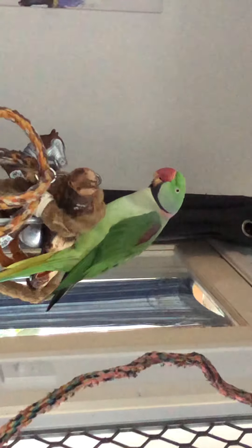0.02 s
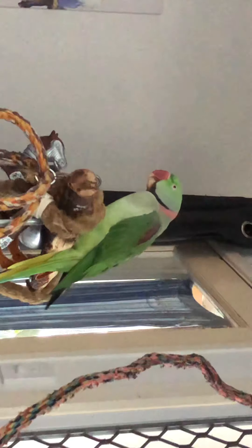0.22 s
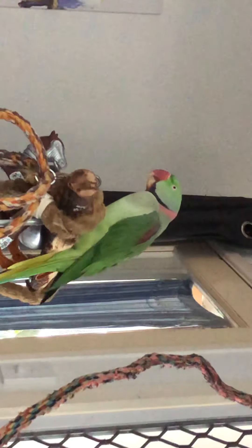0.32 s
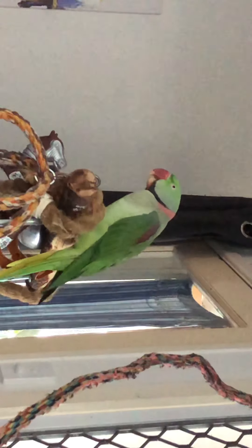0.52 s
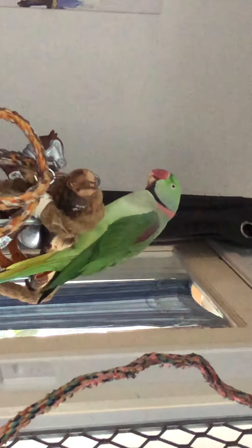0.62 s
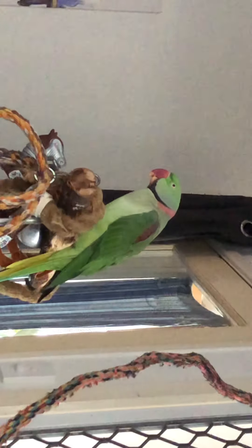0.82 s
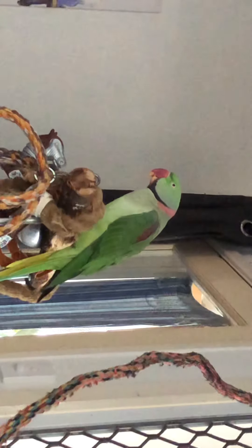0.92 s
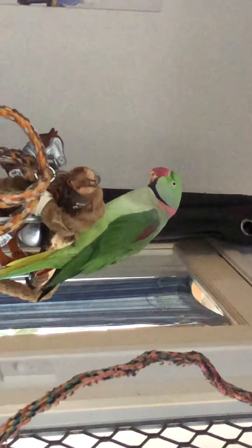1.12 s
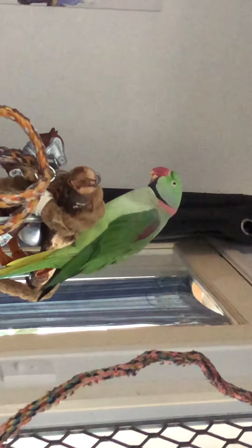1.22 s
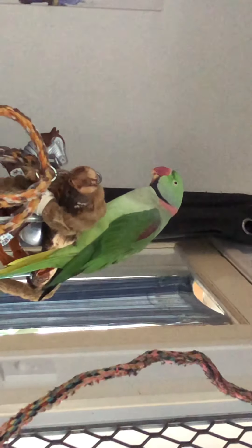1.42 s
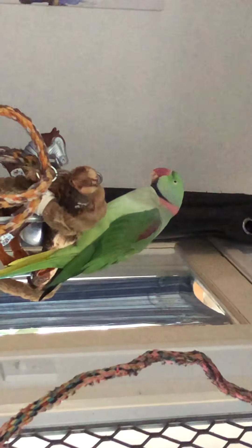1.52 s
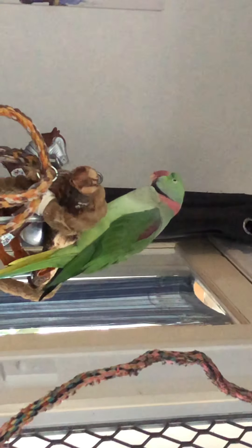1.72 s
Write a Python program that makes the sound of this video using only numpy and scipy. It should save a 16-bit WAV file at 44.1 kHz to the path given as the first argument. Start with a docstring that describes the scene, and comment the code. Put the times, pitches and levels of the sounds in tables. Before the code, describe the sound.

A single loud parakeet squawk breaks a quiet indoor rumble: a quick upward whoop, a raspy drop, then a held buzzing note that stops sharply and rings briefly in a small, hard-walled room, heard in mono.

```python
"""A low, steady background rumble; 0.22 s in, a parakeet gives one loud squawk in a small, hard-walled room.
The voice whoops up, drops through a rasping dip and settles on a held, buzzing note; the room rings on.
Rumble: coloured noise. Voice: syrinx harmonics filtered by throat and beak, plus noise pulsed by each cycle.
Room: discrete near reflections and a diffuse noise tail with its own decay per band."""
import sys
import numpy as np
from scipy import signal
from scipy.fft import rfft, irfft
from scipy.io import wavfile

SR = 44100
rng = np.random.default_rng(int(sys.argv[2]) if len(sys.argv) > 2 else 0)


def file_out(sig):
    """Save sig as 16-bit WAV at sys.argv[1]."""
    # one column per channel
    cols = np.atleast_2d(sig).T
    # limit, then scale
    lim = np.clip(cols, -1, 1)
    pcm = np.round(lim * 32767).astype(np.int16)
    wavfile.write(sys.argv[1], SR, pcm)


N = 79380
TIME_S = np.arange(N) / SR

# background rumble spectrum: freq_hz [Hz], relative_level_db [dB per Hz]
RUMBLE_SPECTRUM = [(28, -31), (35, -16.5), (42, 4), (55, -5.5), (85, -6.5), (125, -1.5), (200, -6.5),
                   (350, -8), (600, -15), (1200, -19.5), (2200, -30), (5000, -37.5), (15000, -42)]
# pitch of the squawk: time_s [s], pitch_hz [Hz]
PITCH_CURVE = [(.222, 967.6), (.228, 1105), (.234, 1418), (.25, 1652), (.257, 1756), (.266, 2120),
               (.275, 2289), (.288, 2333), (.302, 2273), (.311, 2129), (.322, 1700), (.335, 1485),
               (.352, 1413), (.372, 1442), (.39, 1564), (.42, 1599), (.45, 1630), (.495, 1628),
               (.522, 1644)]
# effort of the squawk: time_s [s], level_db [dB], roughness [0-1], odd_harmonics_db [dB],
# overtones_above_second_db [dB], buzz [0-1]
EFFORT_CURVE = [(.223, -29.5, .55, 3, 3, .1), (.24, -21, .42, 2, 4.5, .1), (.26, -14.5, .45, -2, 8, .2),
                (.29, -10, .38, 4, -6, 0.4), (.318, -12.5, .6, -2, 8, .2),
                (.355, -19.5, .55, -6.5, 1.5, .2), (.385, -12, 0.2, -4.5, 1, .4),
                (.415, -10, .3, -4, -3.5, 0.3), (.46, -16, .25, -2, 3, 0.92),
                (.515, -15.5, .22, -1, -1.5, 0.9)]
# syrinx harmonics, from the first up: level_db [dB]
SYRINX_HARMONICS_DB = [-4, 0, -8.5, -6.5, -10, -14.5, -11.5, -15.5, -16.5]
# throat and open-beak response: freq_hz [Hz], gain_db [dB]
THROAT_RESPONSE = [(900, -7), (1400, -10.5), (1650, -8), (2300, -6), (2650, -8), (3250, -1), (3650, 0.5),
                   (4100, -2.5), (4650, -4), (4900, -2), (5300, -6.5), (6000, -1), (7200, -11),
                   (8200, -8.5), (9200, -14), (9900, -19.5), (11500, -15), (15500, -17.5)]
# rasp spectrum: freq_hz [Hz], relative_level_db [dB per Hz]
RASP_SPECTRUM = [(600, -56), (1100, -28.5), (1700, -9), (2200, -2), (2600, -16), (3300, -3.5), (4400, -3),
                 (5100, -13.5), (6100, 2.5), (8000, -6.5), (9200, -12.5), (9900, -20), (11200, -13),
                 (15500, -13.5)]
# near surfaces: delay_s [s], gain_db [dB]
NEAR_REFLECTIONS = [(.0031, -7), (.0074, -23), (0.0143, -20.5)]
# room decay by band: centre_hz [Hz], t60_s [s]
ROOM_DECAY = [(1000, 0.19), (1650, 0.46), (2300, 0.4), (3300, 0.44), (4100, 0.18), (4900, 0.4),
              (8000, 0.33), (11500, 0.25), (15000, 0.27)]

RUMBLE_RMS_DB = -58.5
START_S, ATTACK_S, END_S, RELEASE_S = 0.2199, 0.0074, 0.54, 0.0082
# fractional pitch spread: jitter at full roughness, waver always present
JITTER_FRACTION, JITTER_CORNER_HZ = 0.013, 800
WAVER_FRACTION, WAVER_CORNER_HZ = 0.001, 70
SHIMMER_DB, SHIMMER_CORNER_HZ = 1.5, 240  # level spread at full roughness
# slower syrinx vibration, at full buzz; treble boost applies from the fifth harmonic up
BUZZ_HZ, BUZZ_SWING_RAD, BUZZ_DEPTH, BUZZ_TREBLE_DB = 389, 0.18, 0.06, 6.5
RASP_DB, RASP_PULSE_DEPTH = -9, 0.96  # rasp level at full roughness
ROOM_DB, ROOM_DELAY_S, ROOM_BUILD_S = -1.5, 0.0028, 0.0042
CUTOFF_HZ = 15800


def from_db(db):
    """Decibels to amplitude gain."""
    return 10 ** (np.asarray(db) / 20)


def rms_one(x):
    """Scale to unit rms."""
    return x / np.sqrt(np.mean(x ** 2) + 1e-20)


def in_time(rows):
    """Interpolate each column of a curve at every sample."""
    time_s, *columns = np.transpose(rows)
    return [np.interp(TIME_S, time_s, column) for column in columns]


def at_hz(points, hz):
    """Read a spectrum on a log-frequency axis."""
    freq_hz, value_db = np.transpose(points)
    return np.interp(np.log(np.maximum(hz, 1)), np.log(freq_hz), value_db)


def colour(x, spectrum):
    """Filter by a smooth spectrum."""
    gain = from_db(at_hz(spectrum, np.fft.rfftfreq(N, 1 / SR)))
    return irfft(rfft(x) * gain, N)


def noise(spectrum, flow=1):
    """Noise of unit rms: white noise scaled by the flow, then coloured."""
    return rms_one(colour(flow * rng.standard_normal(N), spectrum))


def drift(corner_hz):
    """Random motion of unit rms: white noise through a double-pole low-pass."""
    pole = np.exp(-2 * np.pi * corner_hz / SR)
    white = rng.standard_normal(2 * N)
    smooth = signal.lfilter([1], [1, -2 * pole, pole * pole], white)
    return rms_one(smooth[N:])  # first half lets the filter settle


def background_rumble():
    """Steady noise, strongest in the bass."""
    return from_db(RUMBLE_RMS_DB) * noise(RUMBLE_SPECTRUM)


def syrinx(phase, odd_db, overtone_db, buzz_amount):
    """Sum of phase-locked harmonics whose balance follows effort and buzz."""
    source = 0
    pitch_hz, = in_time(PITCH_CURVE)
    for k, harmonic_db in enumerate(SYRINX_HARMONICS_DB, 1):
        level_db = harmonic_db + (k % 2) * odd_db + (k > 2) * overtone_db
        level_db = level_db + (k > 4) * BUZZ_TREBLE_DB * buzz_amount
        below_nyquist = k * pitch_hz < SR / 2
        source = source + from_db(level_db) * below_nyquist * np.sin(k * phase)
    return source


def rasp(phase, roughness):
    """Turbulent air pulsed once per voice cycle, growing as roughness squared."""
    flow = 1 + RASP_PULSE_DEPTH * np.cos(phase)
    return from_db(RASP_DB) * roughness ** 2 * noise(RASP_SPECTRUM, flow)


def squawk():
    """Unsteady, buzzing syrinx tone shaped by throat and beak, with air rasping through."""
    pitch_hz, = in_time(PITCH_CURVE)
    level_db, roughness, odd_db, overtone_db, buzz_amount = in_time(EFFORT_CURVE)

    jitter = JITTER_FRACTION * roughness * drift(JITTER_CORNER_HZ)
    waver = WAVER_FRACTION * drift(WAVER_CORNER_HZ)
    buzz = buzz_amount * np.sin(2 * np.pi * BUZZ_HZ * TIME_S)
    phase = 2 * np.pi * np.cumsum(pitch_hz * (1 + jitter + waver)) / SR
    phase = phase + BUZZ_SWING_RAD * buzz

    shimmer = from_db(SHIMMER_DB * roughness * drift(SHIMMER_CORNER_HZ))
    source = syrinx(phase, odd_db, overtone_db, buzz_amount)
    voice = colour(source * (1 + BUZZ_DEPTH * buzz) * shimmer, THROAT_RESPONSE)

    attack = np.clip((TIME_S - START_S) / ATTACK_S, 0, 1)
    release = np.clip((END_S - TIME_S) / RELEASE_S, 0, 1)
    return attack * release * from_db(level_db) * (voice + rasp(phase, roughness))


def room_tail():
    """Diffuse impulse response: overlapping noise bands, each decaying at its own t60."""
    freqs_hz = np.fft.rfftfreq(N, 1 / SR)
    white = rfft(rng.standard_normal(N))
    centres_hz = [hz for hz, _ in ROOM_DECAY]
    tail = 0
    for (_, t60_s), share in zip(ROOM_DECAY, np.eye(len(centres_hz))):
        band = irfft(white * np.interp(freqs_hz, centres_hz, share), N)
        tail = tail + band * from_db(-60 * TIME_S / t60_s)
    tail = tail * np.clip((TIME_S - ROOM_DELAY_S) / ROOM_BUILD_S, 0, 1)
    return from_db(ROOM_DB) * tail / np.sqrt(np.sum(tail ** 2))  # energy set by ROOM_DB


def room(direct):
    """Direct sound plus delayed copies off near surfaces and a convolved diffuse tail."""
    near = sum(from_db(db) * np.roll(direct, int(delay_s * SR)) for delay_s, db in NEAR_REFLECTIONS)
    return direct + near + signal.fftconvolve(direct, room_tail())[:N]


def scene():
    """The rumble, and the bird in its room; one channel."""
    return (background_rumble() + room(squawk()))[None]


def record(dry):
    """Steep elliptic low-pass cuts the top."""
    low_pass = signal.ellip(12, 0.1, 80, CUTOFF_HZ, fs=SR, output="sos")  # 0.1 dB ripple, 80 dB stop
    return signal.sosfilt(low_pass, dry)


dry = scene()
out = record(dry)
file_out(out)
```